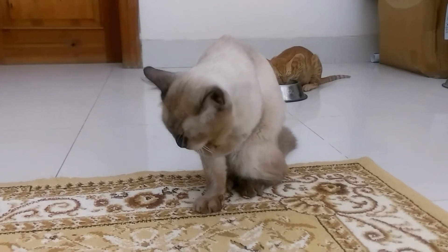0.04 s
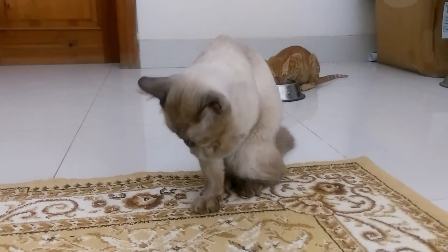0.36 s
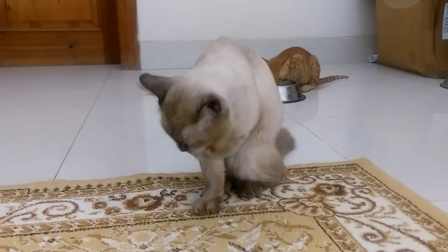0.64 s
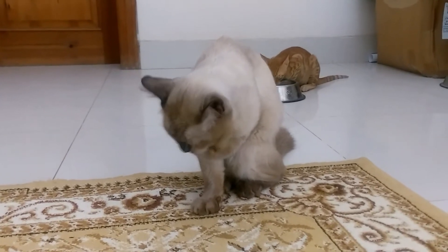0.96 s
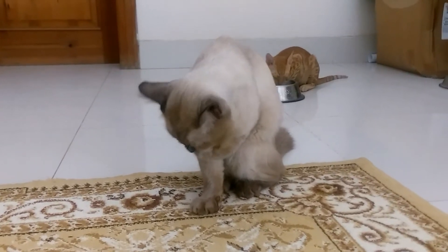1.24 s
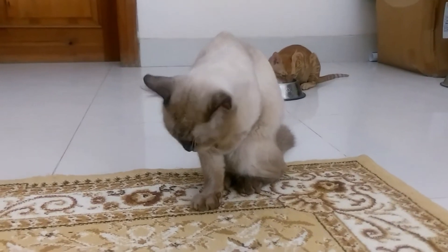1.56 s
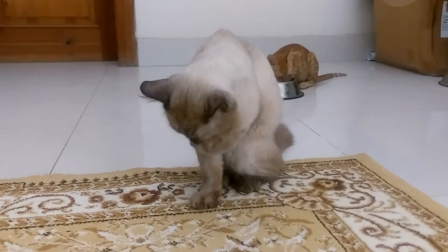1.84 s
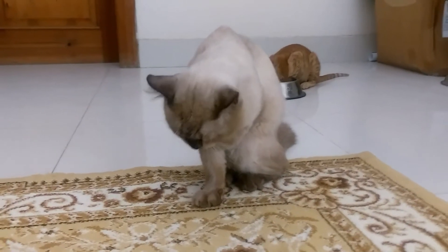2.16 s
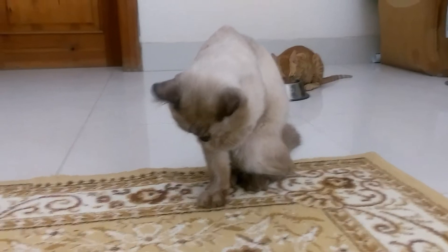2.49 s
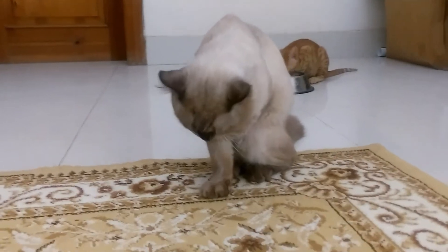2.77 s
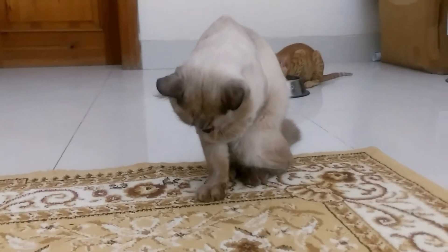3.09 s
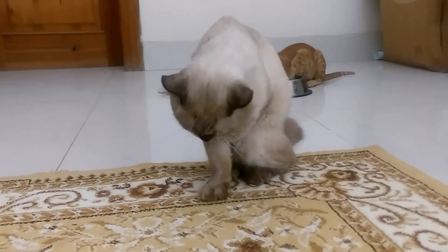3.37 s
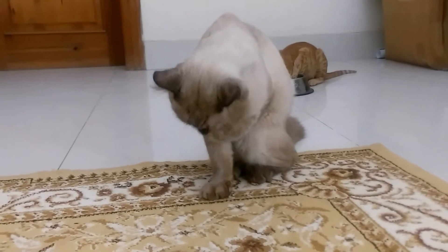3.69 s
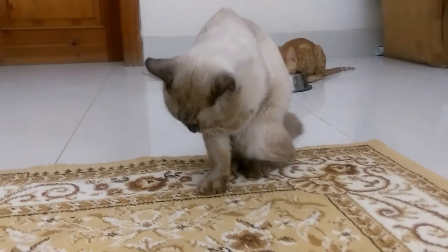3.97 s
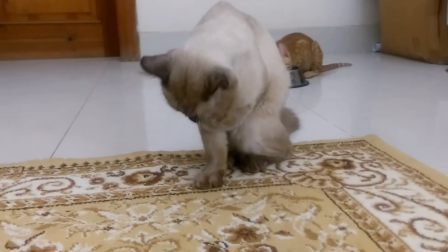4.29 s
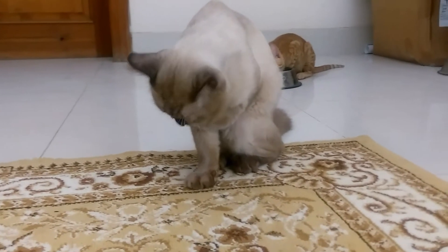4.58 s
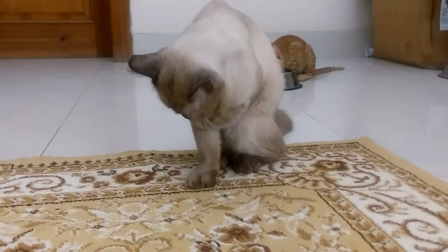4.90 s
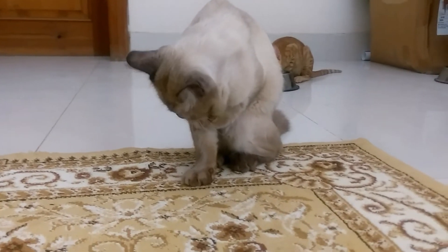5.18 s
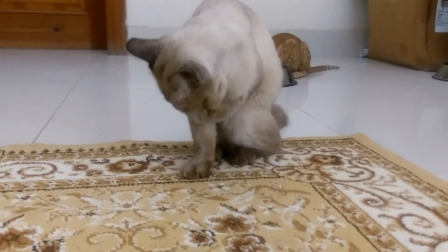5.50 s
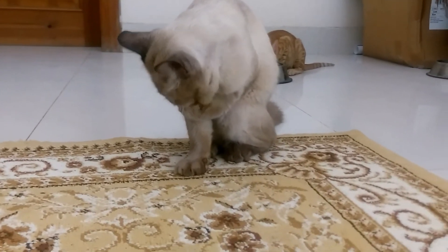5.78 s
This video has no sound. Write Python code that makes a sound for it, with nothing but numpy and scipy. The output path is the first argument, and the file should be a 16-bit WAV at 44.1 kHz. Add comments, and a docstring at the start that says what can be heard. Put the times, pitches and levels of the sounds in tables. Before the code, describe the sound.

A quiet tiled room with a steady fan-like rush, light hiss and faint hum. Right at the start a feeding cat clinks its steel bowl, which rings briefly and rocks to rest. A faint, dull tap follows further off. Soft, close bumps from a hand on the microphone cluster on the right, a low drone swells gently three times, and one last small bump comes near the end.

```python
"""A quiet tiled room on a hand-held stereo microphone: hiss, a fan-like rush, faint hum, a low drone.
Right at the start a feeding cat clinks its steel bowl, which rings and rocks to rest on the tile.
A faint tap follows off in the room near 0.9 s. From 1.2 to 2.2 s the hand shifts on the housing and
soft, close bumps reach the right port. The drone swells in two room modes near 1.8, 2.5 and 3.6 s,
and one last bump comes near 4.8 s."""
import sys
import numpy as np
from scipy import signal
from scipy.fft import rfft, irfft
from scipy.io import wavfile

SR = 44100
rng = np.random.default_rng(int(sys.argv[2]) if len(sys.argv) > 2 else 0)


def master(y):
    """Save y as 16-bit WAV."""
    cut = np.clip(np.atleast_2d(y).T, -1, 1)
    pcm = np.round(cut * 32767)  # scale
    wavfile.write(sys.argv[1], SR, pcm.astype(np.int16))


N = 257544
TIME = np.arange(N) / SR


def gain_of(db):
    """Decibels to amplitude."""
    return 10 ** (np.asarray(db) / 20)


def unit_rms(x):
    """Scales to rms 1."""
    return x / np.sqrt(np.mean(abs(x) ** 2) + 1e-20)


def curve_at(points, hz):
    """Reads a table on a log-frequency axis."""
    f, value = np.transpose(points)
    return np.interp(np.log(hz + 1), np.log(f + 1), value)


def arch(offset):
    """A smooth bell curve: 1 at offset 0, 1/e one half length either side."""
    return np.exp(-np.minimum(offset ** 2, 20))


def panned(lean_db):
    """Port gains that put the left lean_db above the right."""
    return gain_of(np.array([[.5], [-.5]]) * lean_db)


def diffuse_spectra(hz):
    """Random left and right spectra: the two ports hear the room alike only in the bass."""
    # likeness of diffuse sound at the ports: f/Hz, correlation
    likeness = [(30, 0.59), (60, 1), (130, 1), (290, 0.84), (640, 0.84), (1000, 0.34), (1400, 0.21),
                (2000, -0.044), (3500, 0.011)]
    left, other = rng.standard_normal((2, len(hz))) + 1j * rng.standard_normal((2, len(hz)))
    same = np.clip(curve_at(likeness, hz), -1, 1)
    return np.array([left, same * left + np.sqrt(1 - same ** 2) * other])


def wavering_tone(hz, waver, drift_hz):
    """A sine of rms 1 whose level and phase wander slowly."""
    t = np.linspace(0, N / SR, 600)
    rates, phases = rng.standard_normal((2, 24, 1))
    wander = unit_rms(np.exp(2j * np.pi * (drift_hz * rates * t + phases)).sum(0))
    share = np.clip(waver, 0, 1)
    envelope = np.interp(TIME, t, np.sqrt(1 - share ** 2) + share * wander)
    carrier = np.exp(2j * np.pi * (hz * TIME + rng.random()))
    return unit_rms((envelope * carrier).real)


def room(x, low_t60_s=0.22, treble_t60_s=0.33, split_hz=3200, build_s=0.0064):
    """Dense reflections from tiles and walls, different at each port; the treble rings longer."""
    t = TIME[:SR // 2]
    echoes = rng.standard_normal((2, len(t)))
    low = signal.sosfiltfilt(signal.butter(2, split_hz, fs=SR, output="sos"), echoes)
    tail = low * gain_of(-60 * t / low_t60_s) + (echoes - low) * gain_of(-60 * t / treble_t60_s)
    tail *= 1 - np.exp(-t / build_s)
    return signal.fftconvolve(x[None], tail / np.linalg.norm(tail[0]), axes=1)[:, :N]


def microphone_hiss(level_db=-68, lean_db=-0.7):
    """Each port has its own smooth hiss."""
    # noise floor of the microphone: f/Hz, relative density/dB
    noise_floor = [(100, 7), (2500, 2), (4000, -1), (6000, -0.5), (7200, -2.5), (10000, -3.5),
                   (13000, -6.5), (15700, -8.5)]
    colour = gain_of(curve_at(noise_floor, np.fft.rfftfreq(N, 1 / SR)))
    hiss = irfft(rfft(rng.standard_normal((2, N))) * colour, N)
    return gain_of(level_db) * panned(lean_db) * unit_rms(hiss)


def air_rush(level_db=-50.5, fall_db_per_octave=14):
    """Fan-like rush all around the microphone, coloured by the room."""
    # spectrum of the moving air: f/Hz, relative density/dB
    density = [(20, -30), (42, -2), (65, -2.5), (110, -0.16), (150, 0.5), (215, -1), (280, -8.5),
               (460, -16.5), (680, -9.5), (960, -15), (1200, -11), (1550, -19), (2100, -21), (3500, -31)]
    # its balance at the ports: f/Hz, left minus right/dB
    balance = [(50, 3), (130, 1.9), (400, 2), (800, 1.6), (1300, -0.5), (2300, -4.5), (4000, -1.5)]
    # broad resonances, one rising and one dipping: f/Hz, width/Hz, extreme t/s, half length/s, change/dB
    resonances = [(747, 230, 3.9, 2.6, 2.5), (1240, 200, 5.1, 0.68, -5)]
    hz = np.fft.rfftfreq(N, 1 / SR)
    octaves_above_top = np.log2(np.maximum(hz / density[-1][0], 1))
    colour = gain_of(curve_at(density, hz) - fall_db_per_octave * octaves_above_top)
    spectrum = diffuse_spectra(hz) * colour * panned(curve_at(balance, hz))
    rush = irfft(spectrum, N)
    for centre, width, s, half_s, db in resonances:
        band = irfft(spectrum / (1 + (2 * (hz - centre) / width) ** 4), N)
        rush += band * (gain_of(db * arch((TIME - s) / half_s)) - 1)
    return gain_of(level_db) * unit_rms(rush)


def motor_hum(drift_hz=2.5):
    """Faint motor tones that waver in the moving air."""
    # tones of mains and fan motor: f/Hz, rms level/dB, wavering share, left minus right/dB
    tones = [(44.2, -64.5, 0.54, -8.5), (100.5, -60, 0.77, 4), (203.7, -63.5, 1, -0.5),
             (398.4, -77.5, 0.29, -1), (499.4, -75.5, 0.21, -10), (590, -71.5, 0.93, 2),
             (637.4, -72, 0.9, 0.5), (695, -74, 1, -1), (1342, -87, 0.54, -2), (6000, -98, 0.79, 12)]
    return sum(gain_of(db) * panned(lean_db) * wavering_tone(hz, waver, drift_hz)
               for hz, db, waver, lean_db in tones)


def drone(rest_db=-57.5, drift_hz=7, lean_db=1.5):
    """Two low room modes swell together three times, each by its own amount."""
    # room modes: f/Hz, level re rest_db/dB, wavering share
    modes = [(135.2, -6, 0.49), (163.6, -8, 0.78)]
    # swells added to the resting drone: crest t/s, half length/s, lower and upper mode level/dB
    swells = [(1.782, 0.14, -54, -63), (2.52, 0.51, -56, -55.5), (3.62, 0.31, -50.5, -55)]
    both = np.zeros(N)
    for k, (hz, db, waver) in enumerate(modes):
        swell = sum(gain_of(crest_db[k]) * arch((TIME - s) / half_s) for s, half_s, *crest_db in swells)
        both += (gain_of(rest_db + db) + swell) * wavering_tone(hz, waver, drift_hz)
    return panned(lean_db) * both


def tap(at_s=0.94, level_db=-52, band_hz=(470, 1420), half_s=0.006, wet_db=-9):
    """One soft, dull tap somewhere off in the room."""
    band = signal.butter(4, band_hz, "bandpass", fs=SR, output="sos")
    noise = unit_rms(signal.sosfilt(band, rng.standard_normal(N)))
    puff = gain_of(level_db) * arch((TIME - at_s) / half_s) * noise
    return puff + gain_of(wet_db) * room(puff)


def grip_slips(start_s=1.2, end_s=2.05, first_db=-50, last_db=-45.5, per_s=98, spread_db=3):
    """Small random slips that grow until the hand settles: rows of t/s, relative level/dB."""
    chance, size = rng.random(N), rng.standard_normal(N)
    slipping = (chance < per_s / SR) & (TIME > start_s) & (TIME < end_s)
    slip_db = np.interp(TIME, [start_s, end_s], [first_db, last_db]) + spread_db * size
    return zip(TIME[slipping], slip_db[slipping])


def handling_bumps(half_s=0.0031, low_cut_hz=60, damping=1.67, gain_db=6, left_db=-24,
                   rub_db=-30, rub_hz=400):
    """Soft pushes right on the housing; the microphone's low cut makes each swing back and settle."""
    # firm presses of the hand: t/s, relative level/dB
    presses = [(1.409, -49.5), (1.473, -38), (1.895, -26), (1.943, -30), (1.9565, -26), (1.9635, -20),
               (2.0002, -21.5), (2.015, -29), (2.216, -34.5), (4.755, -38)]
    pushes = sum(gain_of(db) * arch((TIME - s) / half_s) for s, db in [*presses, *grip_slips()])
    # skin drags a little while it presses
    rub = unit_rms(signal.lfilter(*signal.butter(2, rub_hz, fs=SR), rng.standard_normal(N)))
    pushes *= 1 + gain_of(rub_db) * rub
    omega = 2 * np.pi * low_cut_hz
    low_cut = signal.bilinear([1, 0, 0], [1, damping * omega, omega ** 2], SR)
    return gain_of(gain_db) * gain_of([[left_db], [0]]) * signal.lfilter(*low_cut, pushes)


def steel_bowl(direct_db=-3, wet_db=-4, scrape_db=-7, scrape_t60_s=0.1, contact_s=0.00068, lean_db=-1):
    """Each knock rings the bowl's modes, with a short gritty scrape of its rim on the tile."""
    # knocks as the bowl tips, drops back and rocks to rest: t/s, relative level/dB
    knocks = [(0.0848, -47.5), (0.0885, -49), (0.1025, -47.5), (.119, -52), (.141, -56), (.168, -67)]
    # modes of the steel: f/Hz, relative level/dB, t60/s
    modes = [(1810, -13, .05), (1920, -6, 0.11), (1970, -9, 0.34), (2025, 7.5, 0.027), (2136, -4, 0.022),
             (4020, -10, 0.054), (4550, -21, .04), (5130, -21, .06), (5420, -16, .06), (5860, -19, .07),
             (5810, -21, 0.07), (6040, -21, 0.053), (6050, -19, 0.056)]
    # spectrum of the rim scraping on tile: f/Hz, relative density/dB
    rim_density = [(1000, -25), (1900, 4), (2450, 0), (3100, -13), (4100, 3), (4800, -3.5), (5850, 4),
                   (6500, -9), (7400, -13), (10000, -23), (15000, -35)]
    t = TIME[:SR // 2]
    ring = sum(gain_of(db - 60 * t / t60) * np.sin(2 * np.pi * hz * t) for hz, db, t60 in modes)
    colour = gain_of(curve_at(rim_density, np.fft.rfftfreq(len(t), 1 / SR)))
    contact = 1 - np.exp(-t / contact_s)  # a nudge, so the ring builds up softly
    clink = np.zeros(N)
    for s, db in knocks:
        grit = unit_rms(irfft(rfft(rng.standard_normal(len(t))) * colour, len(t)))
        scrape = grit * gain_of(scrape_db - 60 * t / scrape_t60_s)
        clink[round(s * SR):][:len(t)] += gain_of(db) * contact * (ring + scrape)
    return panned(lean_db) * (gain_of(direct_db) * clink + gain_of(wet_db) * room(clink))


def scene():
    """Room tone with the small events on top, as they reach the two ports."""
    room_tone = air_rush() + microphone_hiss() + motor_hum() + drone()
    return room_tone + handling_bumps() + steel_bowl() + tap()


def record(dry):
    """The recorder's steep band limit."""
    edge_hz = 15700
    low_pass = signal.firwin(767, edge_hz, window=("kaiser", 8), fs=SR)
    return signal.oaconvolve(dry, low_pass[None], "same", axes=1)


dry = scene()
out = record(dry)
master(out)
```